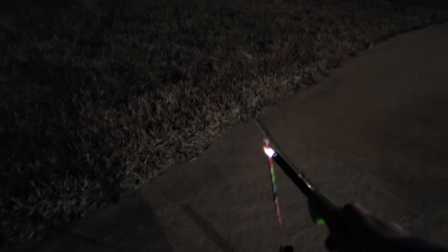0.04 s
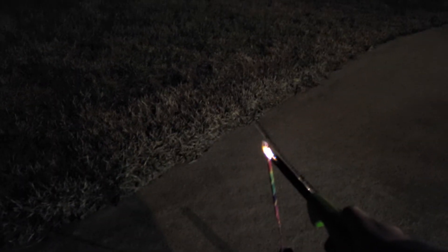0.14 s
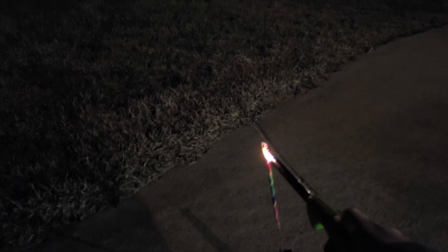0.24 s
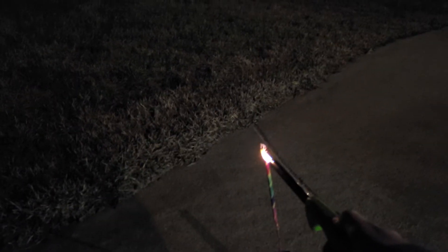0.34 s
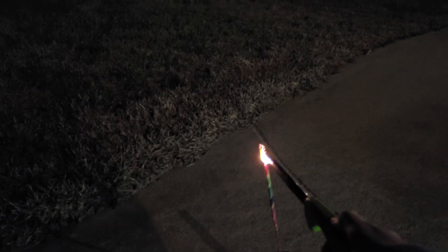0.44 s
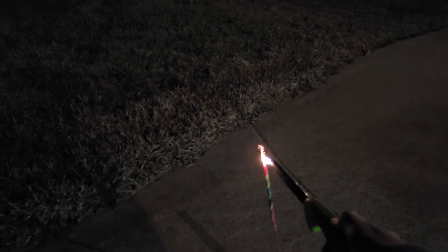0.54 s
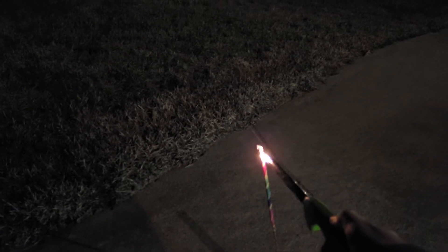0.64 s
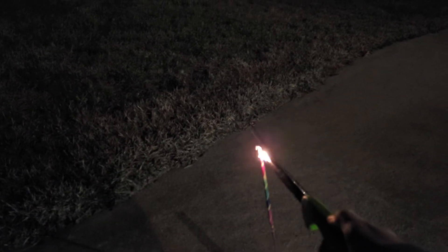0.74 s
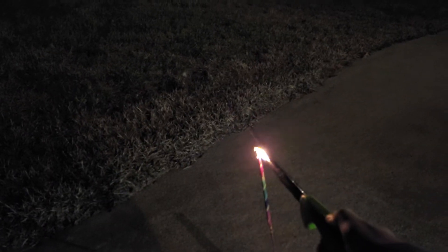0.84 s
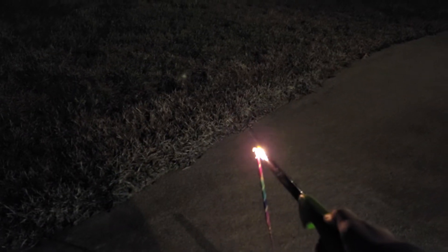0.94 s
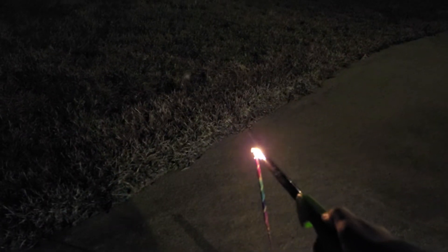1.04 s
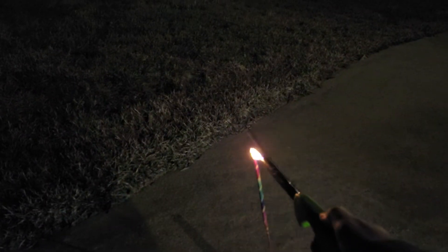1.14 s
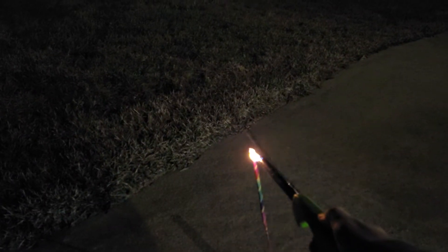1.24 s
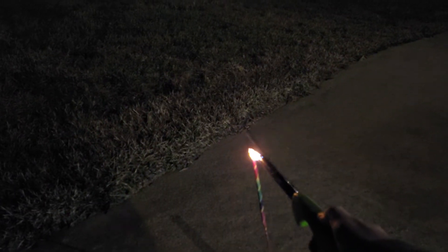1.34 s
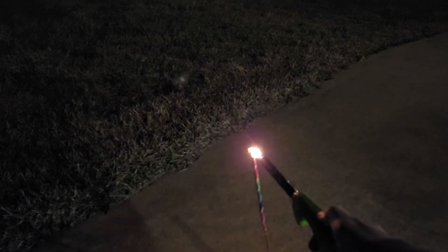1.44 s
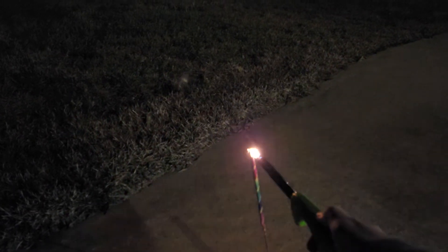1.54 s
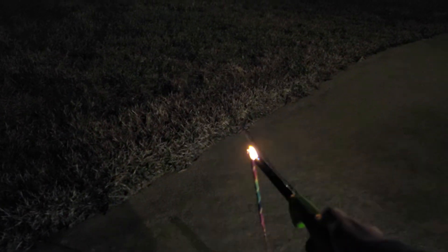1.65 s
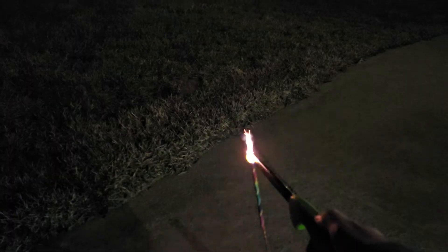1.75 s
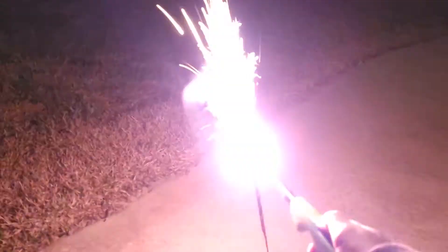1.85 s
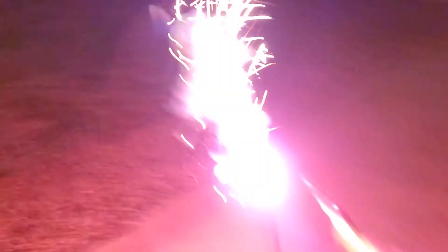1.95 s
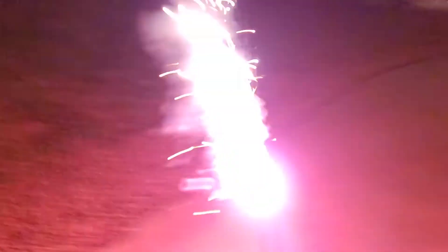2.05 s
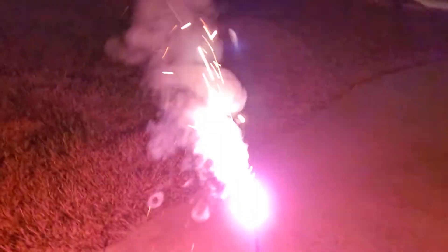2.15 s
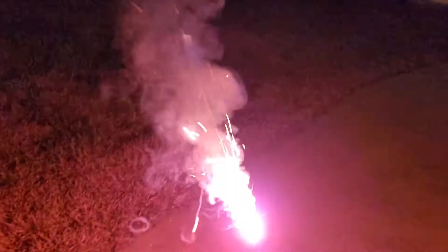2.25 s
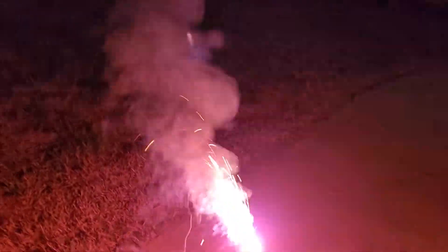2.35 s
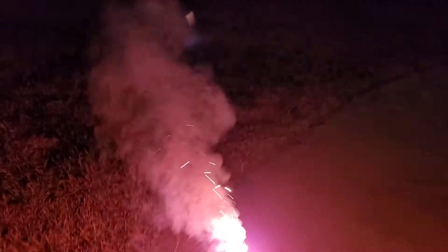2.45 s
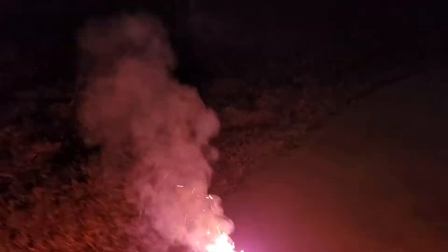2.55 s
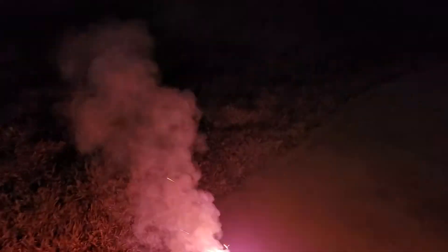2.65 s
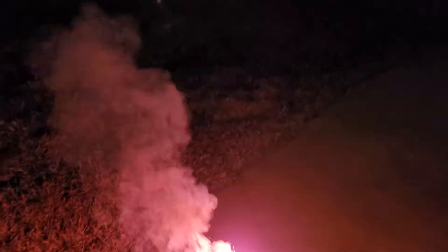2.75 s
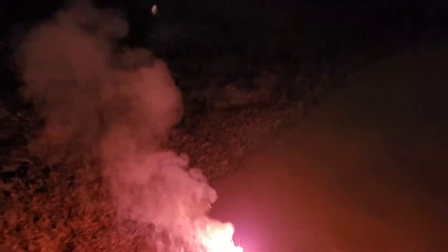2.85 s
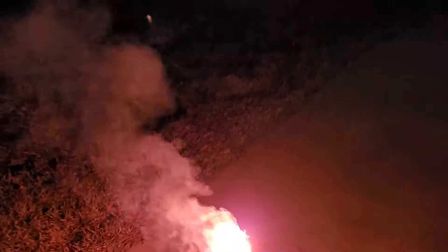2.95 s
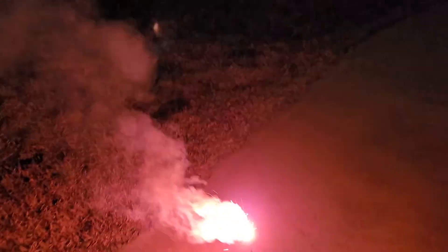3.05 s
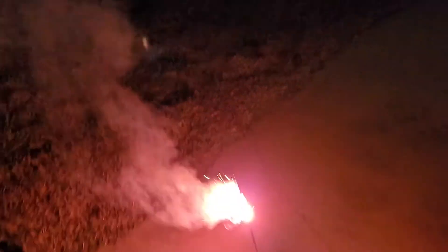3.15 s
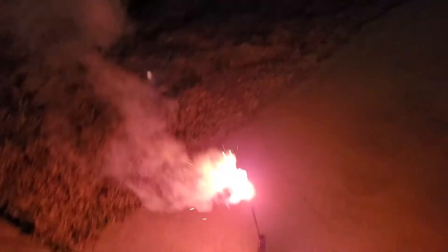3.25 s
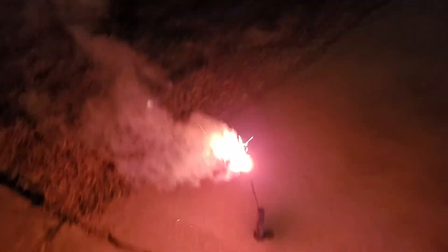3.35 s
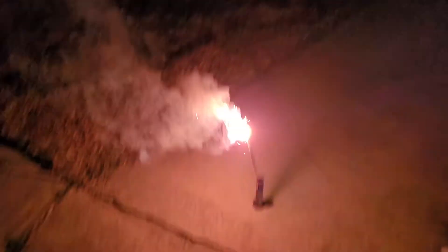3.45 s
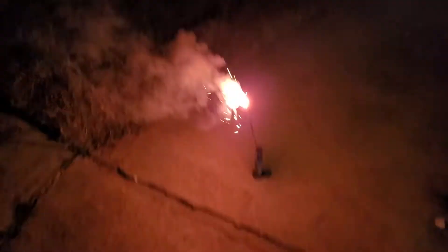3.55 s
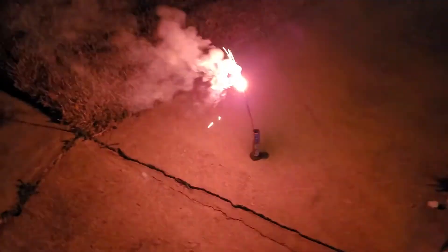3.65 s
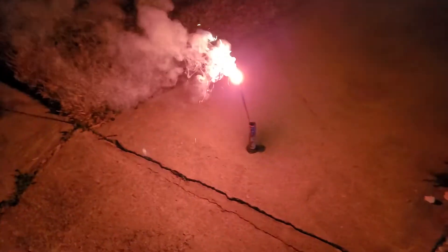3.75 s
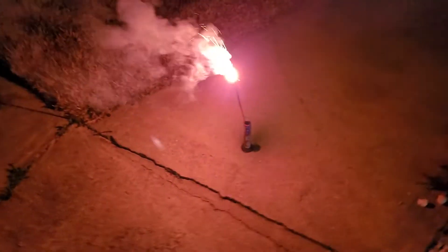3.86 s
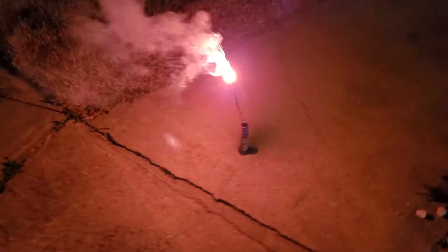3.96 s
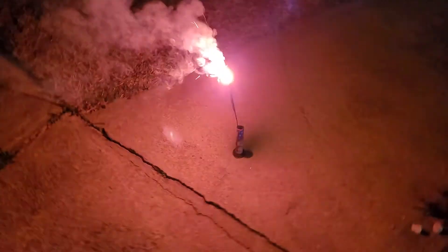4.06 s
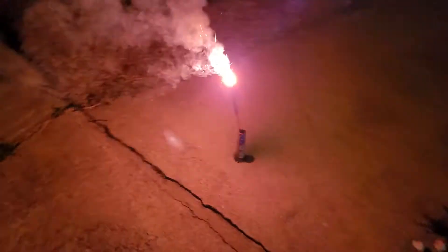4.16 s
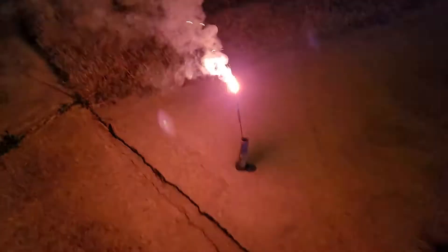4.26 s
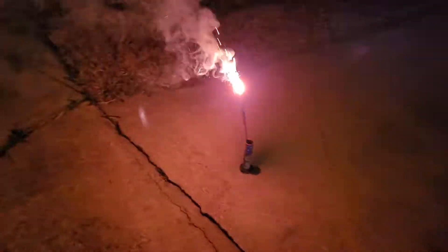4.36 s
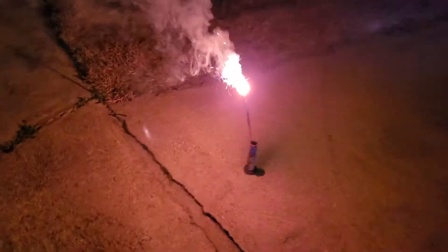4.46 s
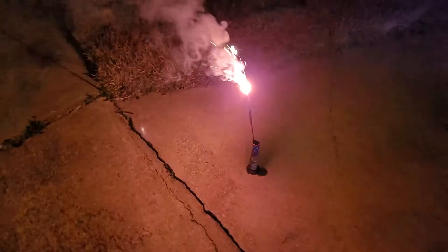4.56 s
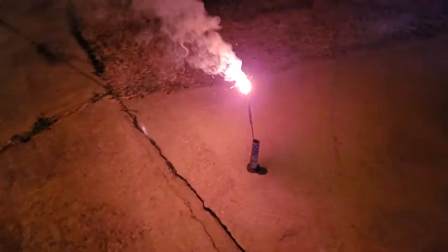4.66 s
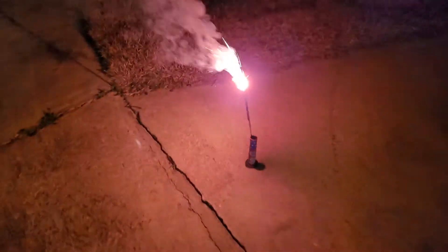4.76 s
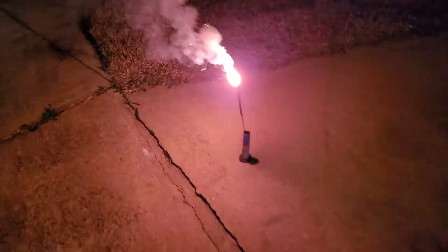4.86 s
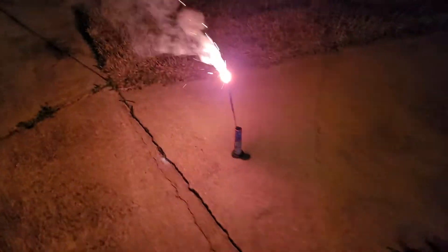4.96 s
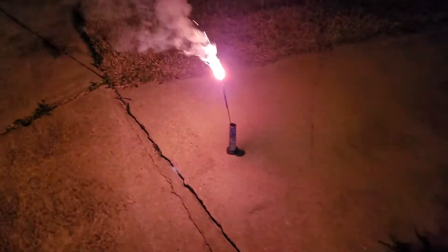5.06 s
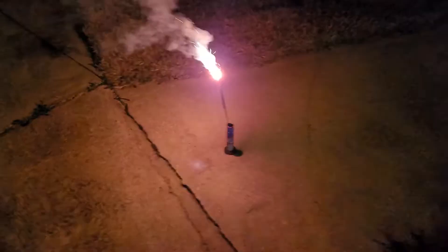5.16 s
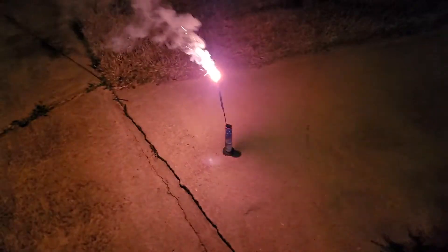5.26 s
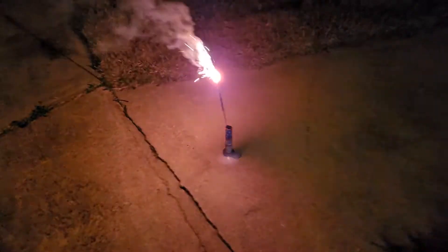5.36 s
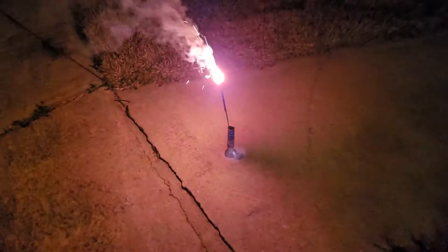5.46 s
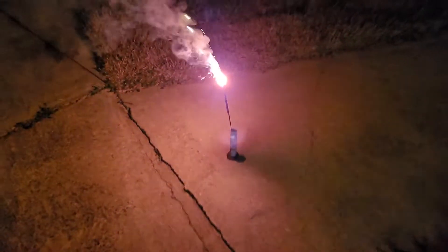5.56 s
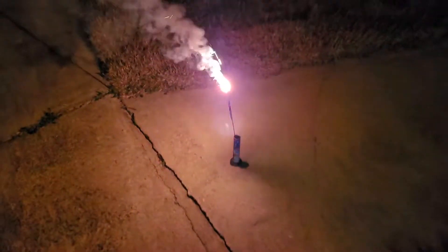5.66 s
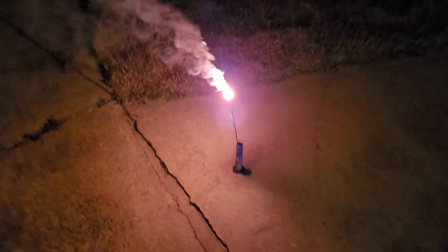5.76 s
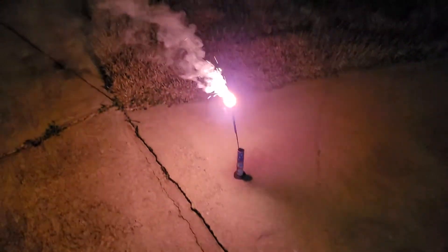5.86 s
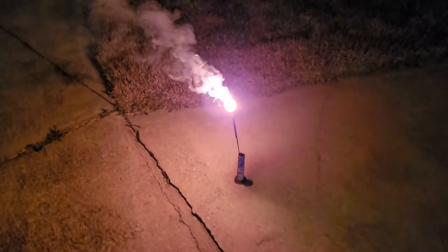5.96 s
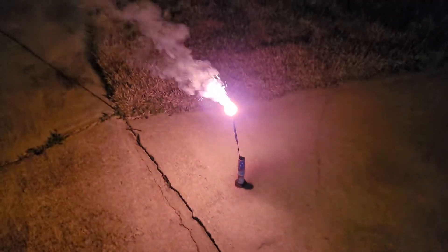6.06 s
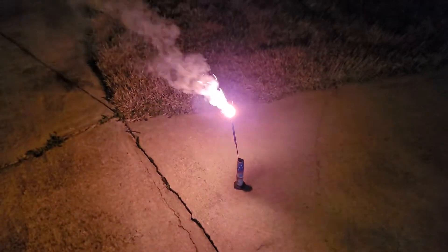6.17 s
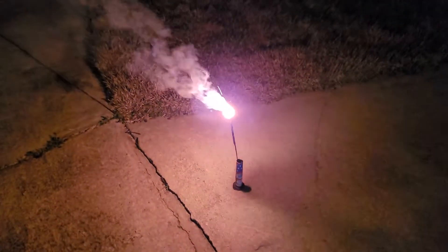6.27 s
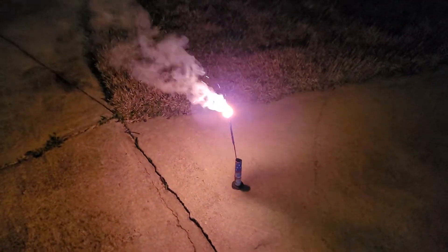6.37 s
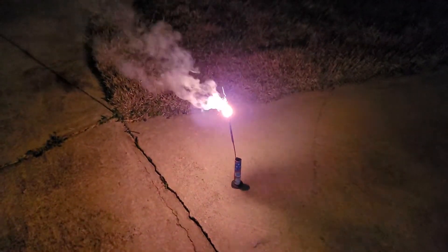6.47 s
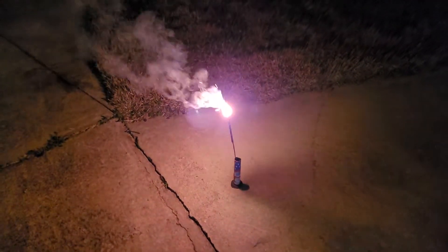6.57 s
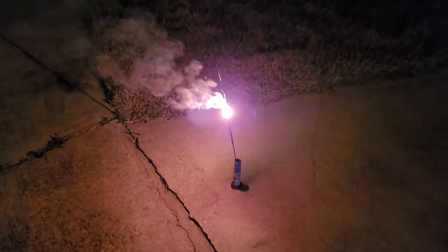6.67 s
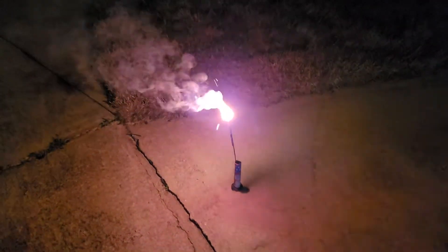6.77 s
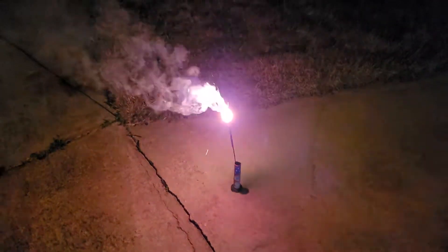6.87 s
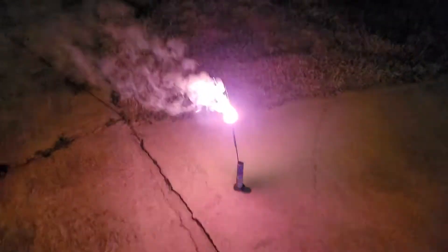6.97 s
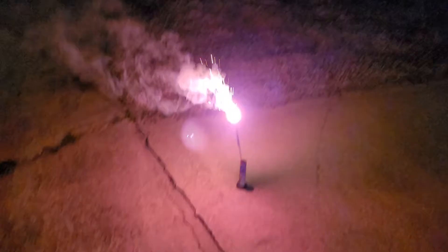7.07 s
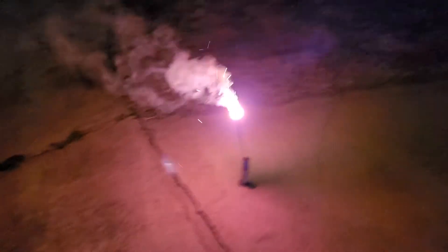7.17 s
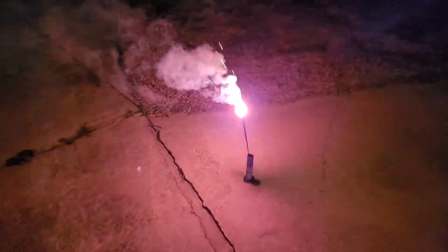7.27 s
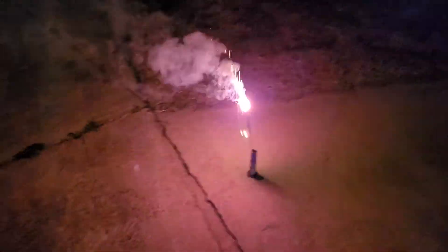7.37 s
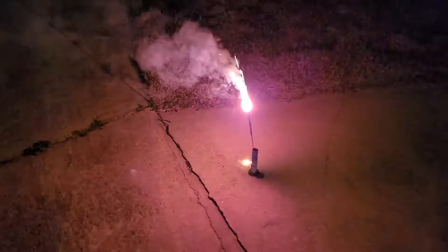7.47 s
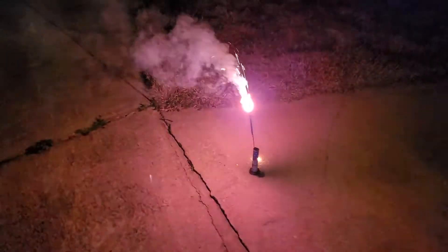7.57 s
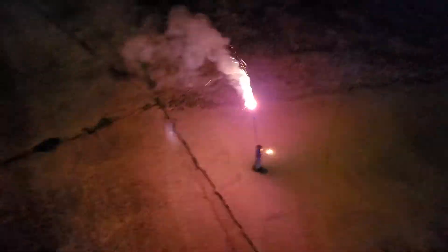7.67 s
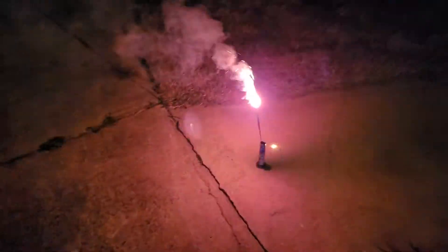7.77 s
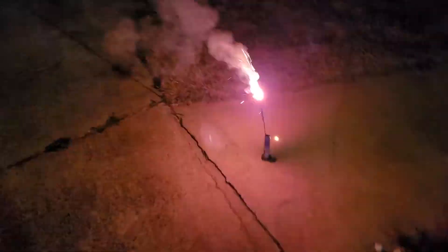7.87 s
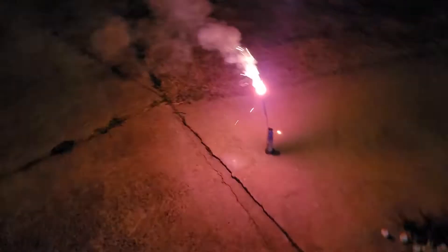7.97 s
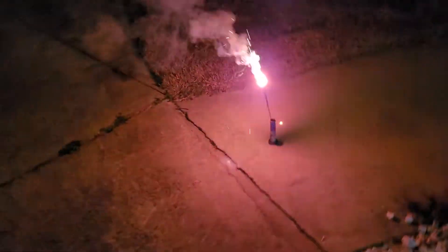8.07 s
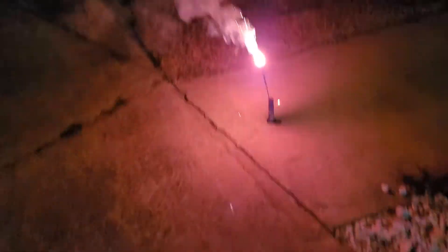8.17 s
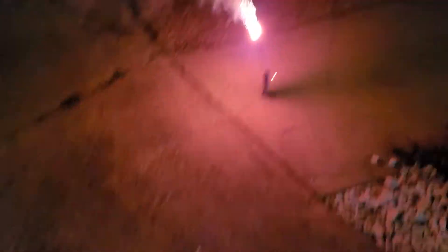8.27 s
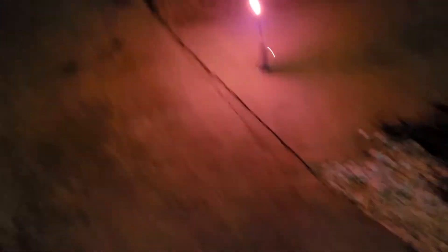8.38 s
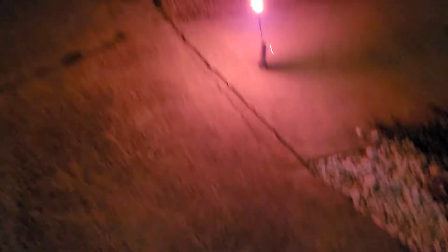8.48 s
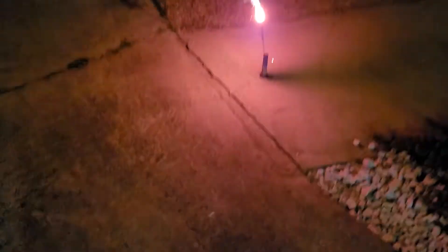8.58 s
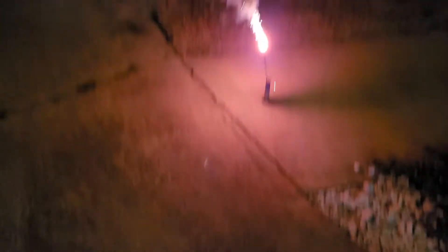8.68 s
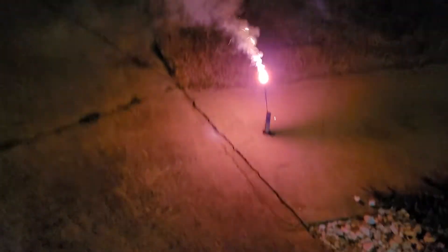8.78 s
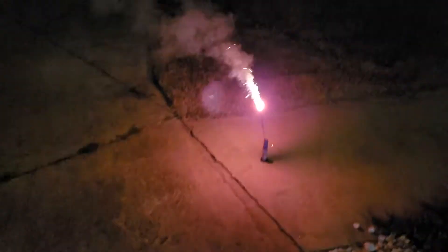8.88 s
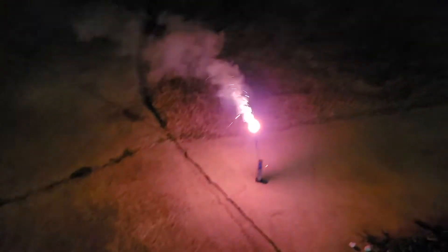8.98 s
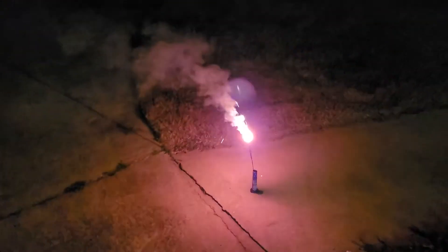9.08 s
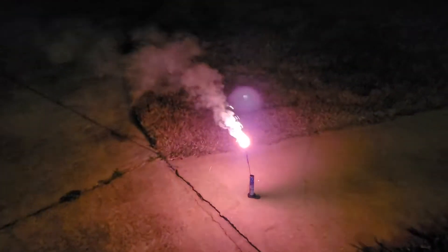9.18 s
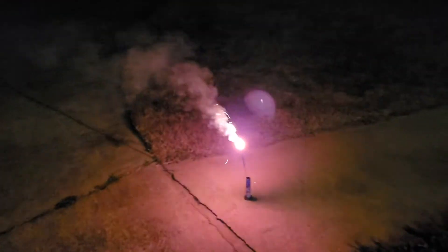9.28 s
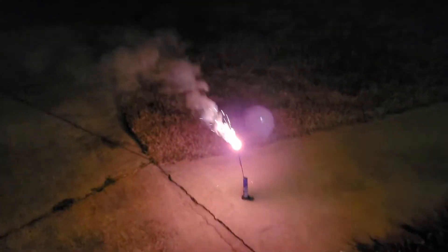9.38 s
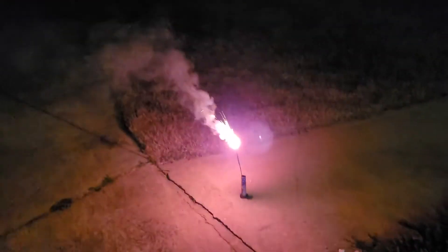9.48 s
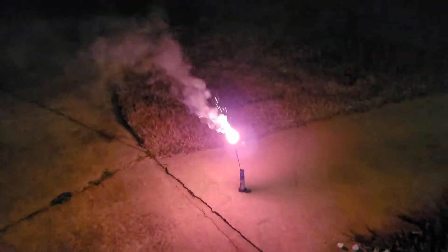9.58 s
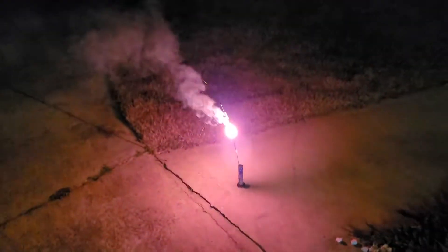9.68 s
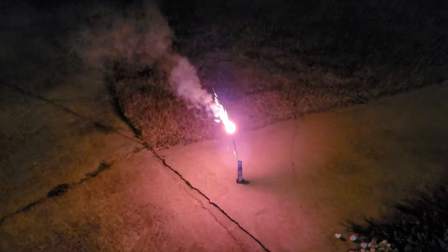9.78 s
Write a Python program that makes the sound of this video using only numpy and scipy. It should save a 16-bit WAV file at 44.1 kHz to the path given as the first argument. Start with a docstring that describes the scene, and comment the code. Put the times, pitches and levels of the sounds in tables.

```python
"""Paving outdoors at night: a sparkler standing on it catches, flares and burns on.
The jet is a dense train of random bursts over smooth gas noise, doubled by an echo off the ground that on
the whole shortens as the flame creeps down and the listener steps back. Filtered clicks make the sparks.
Noise bands make scuffing shoes, nearby snaps, far rumble, soft noise above it and wind; decaying sines make
the knocks of fingers on the handheld case, and wavering sines the far engine and other low tones."""
import sys
import numpy as np
from scipy import signal
from scipy.fft import rfft, irfft
from scipy.io import wavfile
from scipy.ndimage import map_coordinates

SR = 44100
rng = np.random.default_rng(int(sys.argv[2]) if len(sys.argv) > 2 else 0)


def wav_out(sig):
    """Save sig, one row per channel (or a flat mono array), as 16-bit PCM at SR to the path in sys.argv[1]."""
    wavfile.write(sys.argv[1], SR, np.round(np.clip(np.atleast_2d(sig).T, -1, 1) * 32767).astype(np.int16))


N = 433650
HZ = np.maximum(np.fft.rfftfreq(N, 1 / SR), 1)   # kept above zero for the logarithm
SIDES = np.array([[1], [-1]])   # left, right

# Vigour of the upper jet, which catches, flares, sags and then burns in slow surges.
# Each row: time in seconds, level in dB before puffs and chokes.
BURN_CURVE = [(1.815, -98), (1.828, -45), (1.84, -42), (1.85, -36), (1.961, -26.5), (2.05, -29),
              (2.245, -28), (2.371, -35), (2.6, -39.5), (2.97, -46.5), (3.4, -42.5), (3.65, -42.5),
              (3.87, -43), (4.15, -37), (4.3, -40), (4.7, -40), (5.03, -34.5), (5.19, -38.5), (5.27, -40.5),
              (5.6, -40.5), (6.3, -37), (6.4, -41), (6.6, -35.5), (6.8, -39.5), (7.16, -36), (7.36, -38),
              (7.74, -40.5), (8.3, -37), (8.36, -35), (8.46, -39.5), (8.71, -36), (8.92, -42), (9, -37),
              (9.3, -41.5), (9.63, -38.5), (9.83, -42)]
# Lower roar of the jet, which thins as the listener steps back.
# Each row: time in seconds, level in dB before puffs and chokes.
ROAR_CURVE = [(1.815, -100), (1.826, -62), (1.84, -53), (1.85, -40.5), (1.96, -32.5), (2.07, -38.5),
              (2.25, -42), (2.45, -46), (2.7, -45), (2.97, -50), (3.5, -48), (4.7, -48), (5.2, -49.5),
              (7.4, -52), (8.4, -52.5), (8.8, -54.5), (9.1, -55), (9.83, -57)]
# Brief dips of the jet as it chokes, and a few slight lifts.
# Each row: centre in seconds, half width in seconds, change in dB.
JET_CHOKES = [(3.25, .02, -1), (3.571, 0.0084, -8), (3.62, .02, -6), (4.19, .015, 1), (4.41, 0.026, -2),
              (4.55, .015, -0.5), (4.62, 0.0098, -4.5), (7.56, .03, 0.5), (9.31, .02, -3.5)]
# Spectrum of the jet. Each row: frequency in Hz, relative density in dB per Hz.
JET_SPECTRUM = [(230, -21.5), (450, -12.5), (750, -8), (1200, -12.5), (2000, -13), (3000, -10.5),
                (4500, -8), (6300, -6), (7400, -0.5), (8600, -7), (10000, -1.5), (12000, 3.5),
                (14000, -2.5), (15800, -5)]
# Stereo tilt of the jet before the hand turns. Each row: frequency in Hz, left over right in dB.
JET_TILT = [(300, 1.5), (1300, 3.5), (2700, 6.5), (4000, 2.5), (5300, 4.5), (7200, 0), (8600, 9),
            (11000, 1.5), (14000, 15), (15500, 14)]
# Correlation of the jet between the ports. Each row: frequency in Hz, likeness from -1 to 1.
JET_CORRELATION = [(300, 1), (900, 0.21), (1800, 0.86), (4000, 0.63), (7000, 0.43), (10000, 0.21),
                   (13000, 0.099), (15500, 0.4)]
# Reflection off the paving. Each row: time in seconds, extra path in ms, strength below about 6 kHz
# from 0 to 1, strength above it from 0 to 1.
GROUND_REFLECTION = [(1.9, 1.46, .2, .1), (3.2, 1.52, .32, .1), (3.65, 1.41, .32, .12),
                     (4.55, 1.37, .32, .12), (5.3, 1.285, .34, .18), (6.3, 1.28, .38, .23),
                     (7, 1.257, .38, .27), (7.85, 1.195, .35, .27), (8.3, 1.12, .38, .3),
                     (8.65, 1.042, .38, .35), (9.8, 1.043, .4, .38)]
# Listed sparks, loud and faint. Each row: start in seconds, nominal peak of the crack in dB, its lower part
# in dB relative to the crack.
LISTED_SPARKS = [(1.8813, -8.5, -9), (1.9227, -10, -8), (1.9796, -13, 0.5), (2.008, -29, -16),
                 (2.0569, -5, -24), (2.2506, -8, -22), (2.3163, -6.5, -14), (2.4226, -8.5, -12),
                 (2.4939, -12, -15), (2.6002, -11, -21), (2.6455, -9, -15), (2.7099, -16, -10),
                 (2.7598, -9, -14), (2.8406, -24, -4), (3.0382, -14, -12), (3.2224, -21, -5),
                 (3.2758, -8.5, -13), (3.4283, -7, -18), (3.4597, -5.5, -18.5), (3.541, -15, -9),
                 (3.5465, -19, -10), (3.555, -17, -10), (3.5984, -18, -16), (3.601, -20, -14),
                 (3.7795, -25, -19), (3.8329, -33, -20), (3.89, -13, -14), (4.0439, -15, -23),
                 (4.0574, -14, -16), (4.1117, -10, -19), (4.1502, -10, -14), (4.211, -6, -18),
                 (4.2509, -21, -4), (4.3582, -9, -29), (4.449, -19, -16), (4.564, -8, -18),
                 (4.6231, -15, -17), (4.8595, -19, -7), (4.9364, -14, -7), (5.0315, -14, -20),
                 (5.1943, -24, -18), (5.2676, -15, -24), (5.5046, -25, -11), (5.7143, -14.5, -18),
                 (5.9002, -18, -18), (6.0952, -11.5, -13), (6.5507, -11, -21), (6.6479, -11.5, -16),
                 (6.7854, -18, -16), (6.857, -23, -24), (7.1432, -10, -31), (7.1648, -10.5, -26),
                 (7.2366, -15, -17), (7.623, -15.5, -11), (7.7734, -16, -22), (8.353, -12.5, -15),
                 (8.3725, -14, -30), (8.7628, -21, -9), (8.825, -26, -26), (9.0296, -17, -20),
                 (9.204, -17, -28), (9.6147, -17, -15), (9.7618, -14, -19)]
# The hand turns. Each row: time in seconds, left over right in dB (only its departure from the mean acts),
# delay of the left port in microseconds, level change around 8-11 kHz in dB.
HAND_TURNS = [(1.8, 10, -3, 2.5), (2.3, 8.5, -5, -2), (2.7, 5.5, 44, -1), (3.2, 7.5, 60, -1),
              (3.8, 6.5, -5, 0), (4.7, 7, 26, -2.4), (5.05, 7.5, 2, -1), (5.6, 9, 10, 0),
              (6.4, 6.5, -56, 0.5), (7.1, 8, 5, -1), (7.4, 9, 29, -4.5), (7.95, 8.5, -1, -0.5),
              (8.5, 9, 10, -1.5), (9.8, 9.5, -15, -1)]
# Dry snaps close by. Each row: start in seconds, nominal peak in dB, low edge in Hz, high edge in Hz,
# 60 dB decay time of the tail in seconds.
NEAR_SNAPS = [(2.008, -14, 500, 3000, 0.039), (2.2491, -23, 905, 3000, 0.041),
              (2.6699, -12, 1610, 8200, .025), (2.6955, -21, 1200, 3500, .03),
              (2.711, -23, 1700, 8520, .03), (2.715, -35, 1600, 3000, 0.028), (2.746, -38, 1400, 2300, .03),
              (7.4596, -18, 900, 8000, 0.041), (7.4756, -19, 901, 6960, 0.043),
              (8.978, -16, 904, 4500, 0.024), (8.9833, -25, 1000, 4010, 0.04)]
# Shoes scuffing on grit. Each row: start in seconds, length in seconds, level in dB before the press and
# lift, low edge in Hz, high edge in Hz, weight of the noise unlike at the two ports.
SHOE_SCUFFS = [(2.638, .16, -45, 1530, 2700, 0.27), (7.012, 0.12, -47.5, 700, 2040, 1.3),
               (8.932, 0.085, -47, 890, 2030, 0.35)]
# Fingers on the case. Each row: start in seconds, nominal left level in dB, ringing frequency in Hz,
# tick relative to the ring in dB, signed share of ring and tick that reaches the right port.
CASE_KNOCKS = [(1.9793, -12.5, 234, -4.5, -0.11), (2.110, -19, 219, -23, -0.13),
               (2.209, -19.5, 224, -29, -0.15), (7.267, -32, 247, -27, 0.0),
               (7.359, -31, 149.7, -25, 0.032), (8.6195, -9.5, 267.4, -15, 0.065),
               (8.7184, -14, 256.4, -29, 0.011), (9.5232, -28, 376, -2.5, 0.34)]
# Far engine. Each row: time in seconds, mean firing frequency in Hz, mean level in dB, mean level of
# its octave in dB.
ENGINE_CURVE = [(3.4, 85.5, -66, -69), (3.48, 84.7, -50, -55), (3.64, 84.7, -57, -62),
                (3.74, 83.4, -48.5, -55.5), (3.91, 82.9, -68, -60), (4, 83.2, -48.5, -60),
                (4.13, 84.7, -54, -59.5), (4.31, 84.1, -47.5, -50), (4.41, 83.5, -56, -48),
                (4.57, 82, -45.5, -55.5), (4.72, 82.3, -56.5, -53), (4.8, 81.6, -47.5, -62),
                (5.2, 79.1, -55.5, -60.5), (5.35, 78.2, -50, -71), (5.67, 77.9, -48.5, -52.5),
                (5.97, 74.5, -53.5, -63), (6.16, 80.7, -63, -77), (6.36, 80, -70, -57),
                (6.52, 79.7, -45.5, -60.5), (6.72, 78.6, -58, -64), (6.8, 83.3, -69, -57),
                (6.9, 86.5, -60, -64), (7.2, 85.3, -56.5, -59), (7.5, 85, -63, -61.5),
                (7.68, 83.5, -49, -55), (7.8, 83.2, -62, -56.5), (8.05, 79.7, -55, -59),
                (8.19, 79, -67, -60), (8.3, 80.7, -43.5, -63), (8.4, 80.4, -51, -61),
                (8.51, 80.3, -61, -64), (8.87, 77.5, -65, -62), (9.04, 77.8, -52.5, -63),
                (9.13, 78.5, -68, -67), (9.26, 78.5, -53, -64), (9.42, 78.5, -70, -66),
                (9.58, 80, -55.5, -59), (9.75, 80.5, -67, -69), (9.83, 81, -56, -64)]
# Low tones: far hums, and two near 83 Hz that go with wind and knocks. Each row: start in seconds, length
# in seconds, first mean frequency in Hz, last mean frequency in Hz, crest level in dB before the throb.
LOW_TONES = [(.66, 0.26, 89.5, 94, -58), (2.05, .2, 82.7, 83, -67), (2.05, 1.78, 183.3, 198, -58),
             (2.6, 0.4, 82.6, 83, -59.5), (8.95, 0.74, 179, 179.8, -58.5)]
# Far rumble, and soft noise mostly above 420 Hz. # Each row: time in seconds, rumble in dB before its swell,
# soft noise in dB.
NIGHT_LEVELS = [(0, -64, -63.5), (.6, -58.5, -64), (1.25, -57.5, -63.5), (1.7, -57.5, -62), (2, -50, -60),
                (2.6, -52, -61), (3.1, -61.5, -54.5), (3.6, -53.5, -56), (4.5, -58, -62.5), (6.1, -58, -62),
                (6.3, -60.5, -63.5), (7.2, -57, -59.5), (8.3, -58, -59.5), (9, -59, -57.5),
                (9.83, -64, -59)]
# Spectrum of rumble and soft noise. Each row: frequency in Hz, relative density in dB per Hz.
NIGHT_SPECTRUM = [(35, -49), (60, -26), (79, -5), (139, -4.5), (262, -5), (346, -13), (448, -24.5),
                  (924, -17), (1110, -25.5), (1340, -27), (1700, -37), (2970, -42), (4640, -78),
                  (6900, -51), (16000, -78)]
# Stereo tilt of rumble and soft noise. Each row: frequency in Hz, left over right in dB.
NIGHT_TILT = [(60, 4), (110, 2), (200, 1), (380, 0), (700, -1), (1290, 5.5), (2380, 13.5), (4400, 39.5),
              (8120, 8), (15000, -12)]
# Correlation of rumble and soft noise between the ports. Each row: frequency in Hz, likeness from -1 to 1.
NIGHT_CORRELATION = [(60, 1), (130, 1), (290, 0.9), (640, 0.018), (1410, -0.27), (3100, 0.09),
                     (6820, -0.16), (15000, 0.2)]
# Gusts. Each row: crest in seconds, half width in seconds, level in dB, left over right in dB.
WIND_GUSTS = [(.95, 0.22, -65, -1), (2.46, .07, -52.5, 24), (2.9, 0.27, -63.5, 1), (3.74, 0.073, -54, 0),
              (4.9, 1.3, -59, -2), (4.68, 0.068, -60, 0), (5.6, 0.097, -62, 0), (6.6, 0.19, -64, -5),
              (7.7, .1, -58, 3), (8.35, .15, -59, -5), (8.7, .08, -55, 10), (9.4, 0.52, -63, -1)]

SPLIT_HZ = 5810   # soft crossover between the lower and upper jet
BURSTS_PER_S = 5000
PUFF_DB, PUFF_S = -5.5, 0.015   # swell of the jet after a full-scale spark, and its decay time
RANDOM_SPARKS_PER_S, RANDOM_SPARK_DB, RANDOM_LOW_DB = 7.7, -25, -16
RANDOM_SPREAD_DB = 4   # either way
BREEZE_DB, BREEZE_LUMPS_DB = -71, 2.5   # steady wind on the ports, and its slow variation
SELF_NOISE_DB = -85


def from_db(db):
    """Level to amplitude: twenty decibels make a factor of ten."""
    return 10 ** (np.asarray(db) / 20)


def rms_one(x):
    """Normalization: the mean square over all channels becomes one."""
    return x / np.sqrt(np.mean(x ** 2) + 1e-20)


def in_time(rows):
    """Linear interpolation in time: each column of a table, one value a sample."""
    s, *columns = np.transpose(rows)
    return [np.interp(np.arange(N) / SR, s, c) for c in columns]


def at_hz(points):
    """Interpolation over logarithmic frequency, onto the spectral grid."""
    hz, value = np.transpose(points)
    return np.interp(np.log(HZ), np.log(hz), value)


def drift(rate_hz):
    """Low-passed chance: two equal poles near rate_hz leave a slow random curve of spread one."""
    step = 40   # samples between drawn values
    pole = np.exp(-2 * np.pi * rate_hz * step / SR)
    draws = rng.standard_normal(N // step + 2002)
    slow = signal.lfilter([1], [1, -2 * pole, pole * pole], draws)[2000:]   # settled part only
    return np.interp(np.arange(N) / step, np.arange(len(slow)), rms_one(slow))


def band(x, low_hz, high_hz):
    """Band-pass filtering: only the range between the two edges is kept strong."""
    return signal.sosfilt(signal.butter(2, [low_hz, high_hz], "band", fs=SR, output="sos"), x)


def to_ears(pair, spectrum, balance, likeness):
    """Interaural correlation: shared and opposed signals mix by likeness into left and right spectra."""
    mid, side = rfft(pair)
    alike = np.clip(at_hz(likeness), -1, 1)
    gain = from_db(at_hz(spectrum) + at_hz(balance) * SIDES / 2)
    return gain * (np.sqrt(1 + alike) * mid + np.sqrt(1 - alike) * side * SIDES)


def ground(x, dull_hz=6000):
    """Comb filtering by a moving echo; treble lost on rough paving returns at grazing angles."""
    extra_ms, strength, treble = in_time(GROUND_REFLECTION)
    read_at = np.arange(N) - extra_ms * SR / 1000
    dull = signal.sosfiltfilt(signal.butter(2, dull_hz, fs=SR, output="sos"), x)
    # the treble leads the rest by a sample
    bounce = strength * np.roll(dull, 1, axis=1) + treble * (x - dull)
    return x + np.array([map_coordinates(c, [read_at], order=5) for c in bounce])


def low_and_high(pair):
    """Spectral colouring: a source takes the jet's spectrum and echo, split at a soft crossover."""
    ears = to_ears(ground(pair), JET_SPECTRUM, JET_TILT, JET_CORRELATION)
    upper = 1 / (1 + (SPLIT_HZ / HZ) ** 4)
    return irfft(ears * (1 - upper), N), irfft(ears * upper, N)


def jet(spark_s, spark_db, spread_db=4.0, gas_low=1.23, gas_high=0.92, flicker_db=1.19):
    """Shot noise: metal grains burst at random, few of them large, over smooth gas strongest in the roar."""
    grain_db = spread_db * np.minimum(rng.exponential(1, N), 5.0)
    sizes = from_db(grain_db) * (rng.random(N) < BURSTS_PER_S / SR)
    # shared bursts favour one polarity
    signs = np.where(rng.random((2, N)) < [[.7], [.5]], -1, 1)
    bursts = rms_one(sizes * signs)

    # each spark swells the jet, which then settles exponentially
    puffs = np.zeros(N)
    puffs[(spark_s * SR).astype(int)] = from_db(spark_db + PUFF_DB)
    swell = 1 + signal.lfilter([1], [1, -np.exp(-1 / (PUFF_S * SR))], puffs + 1e-18)
    for s, width, depth_db in JET_CHOKES:
        swell = swell * from_db(depth_db * np.exp(-((np.arange(N) / SR - s) / width) ** 2))

    gas = rng.standard_normal((2, N))
    flicker = from_db(flicker_db * (0.8 * drift(10) + 0.85 * drift(72)))
    low = low_and_high((bursts + gas_low * gas) * flicker)[0]
    high = low_and_high((bursts + gas_high * gas) * flicker)[1]
    upper_jet = from_db(in_time(BURN_CURVE)[0]) * rms_one(high)
    lower_roar = from_db(in_time(ROAR_CURVE)[0]) * rms_one(low)
    lit = np.arange(N) > BURN_CURVE[0][0] * SR
    return lit * swell * (upper_jet + lower_roar)


def spark_rows():
    """Poisson process: sparks at random intervals join the listed ones; times, peaks, lower parts."""
    draws = rng.random((300, 2))
    s = BURN_CURVE[0][0] + np.cumsum(-np.log(draws[:, 0]) / RANDOM_SPARKS_PER_S)
    peak_db = RANDOM_SPARK_DB + RANDOM_SPREAD_DB * (2 * draws[:, 1] - 1)
    random_rows = np.c_[s, peak_db, np.full(len(s), RANDOM_LOW_DB)]
    return np.transpose(np.r_[LISTED_SPARKS, random_rows[s < N / SR - .01]])


def sparks(s, peak_db, low_db, rise_s=0.0011, splinter=0.11, crisp=0.45):
    """Impulse excitation: each spark is a crack coloured like the jet, with a few splinters just after."""
    at = ((s + rise_s) * SR).astype(int)
    after = rng.integers(3, 90, (len(s), 3))   # samples from crack to splinter
    sizes = splinter * rng.standard_normal((len(s), 2, 3))
    parts = []
    for part, level_db in enumerate([peak_db + low_db, peak_db]):   # lower, upper
        clicks, unit = np.zeros((2, N)), np.zeros((2, N))
        clicks[0, at] = -from_db(level_db)
        clicks[:, at[:, None] + after] = from_db(level_db)[:, None] * sizes.transpose(1, 0, 2)
        unit[0, N // 2] = 1   # a lone click sets the reference peak
        # the upper part is brighter than the jet
        clicks, unit = (signal.lfilter([1, -crisp * part], [1], c) for c in (clicks, unit))
        reference = np.abs(low_and_high(unit)[part].mean(axis=0)).max()
        parts.append(low_and_high(clicks)[part] / reference)
    return sum(parts)


def at_ports(ears):
    """Level and time differences: the flame moves across the two ports; the case shades one band."""
    pan_db, late_us, shadow_db = in_time(HAND_TURNS)
    shaded = irfft(rfft(ears) * np.exp(-((HZ - 9600) / 1500) ** 4), N)
    ears = ears + (from_db(shadow_db) - 1) * shaded
    left = map_coordinates(ears[0], [np.arange(N) - late_us * SR / 1e6], order=5)
    return np.array([left, ears[1]]) * from_db((pan_db - pan_db.mean()) * SIDES / 2)


def snaps(rise_s=0.000858, tail_db=-24):
    """Impulse and decay: one sharp break, then a dying tail of noise, both in the band of the event."""
    out, t = np.zeros((2, N)), np.arange(SR // 5) / SR
    noises = rng.standard_normal((len(NEAR_SNAPS), 2, len(t)))
    for (s, peak_db, low_hz, high_hz, t60), noise in zip(NEAR_SNAPS, noises):
        tail = from_db(tail_db - 60 * t / t60) * noise
        burst = band(tail - (t == 0), low_hz, high_hz)
        at = int((s + rise_s) * SR)
        out[:, at:at + len(t)] += from_db(peak_db + 1.5 * SIDES) * burst / np.abs(burst).max()
    return out


def scuffs(grains_per_s=1200, spread_db=2.0):
    """Granular friction: grit crunches at random under a sole that presses and lifts."""
    out = np.zeros((2, N))
    grain_db = spread_db * np.minimum(rng.exponential(1, N), 4.0)
    grit = from_db(grain_db) * (rng.random(N) < grains_per_s / SR)
    shared, own = grit * rng.choice([-1, 1], N), grit * rng.choice([-1, 1], (2, N))
    for s, length, level_db, low_hz, high_hz, unlike in SHOE_SCUFFS:
        span = slice(int(s * SR), int((s + length) * SR))
        crunch = rms_one(band(shared[span] + unlike * own[:, span], low_hz, high_hz))
        along = np.linspace(0, 1, crunch.shape[1])
        weight = np.sin(np.pi * along ** 0.72)   # quick press, slower lift
        out[:, span] += from_db(level_db + 0.63 * SIDES) * crunch * weight
    return out


def knocks(rustle_t60_s=.15, rustle_db=-26):
    """Damped resonance: the case rings low for a few cycles, with a dull tick and a rustle of the grip."""
    out, t = np.zeros((2, N)), np.arange(SR // 4) / SR
    noises = rng.standard_normal((len(CASE_KNOCKS), 2, len(t)))
    for (s, level_db, hz, tick_db, right), noise in zip(CASE_KNOCKS, noises):
        push = np.sin(2 * np.pi * hz * t) * from_db(-60 * t / .022) * (1 - np.exp(-t / .0015))
        tick_tones = np.sin(2 * np.pi * 1100 * t) + 1.8 * np.sin(2 * np.pi * 560 * t)
        tick = from_db(tick_db) * tick_tones * np.exp(-t / 0.0019)
        rustle = from_db(rustle_db - 60 * t / rustle_t60_s) * rms_one(band(noise, 150, 2800))
        knock = band(push + tick, 38, 3000) * [[1], [right]] + rustle
        at = int(s * SR)
        out[:, at:at + len(t)] += from_db(level_db) * knock
    return out


def drone(hz, level_db, waver_hz, throb_db, pan_db):
    """Frequency and amplitude modulation: one low tone wavers and throbs at random."""
    phase = 2 * np.pi * np.cumsum(hz + waver_hz * drift(7.8)) / SR
    loudness = np.sqrt(2) * from_db(level_db + throb_db * drift(6.3) + pan_db * SIDES)
    return loudness * np.sin(phase + 0.11 * SIDES)


def engine():
    """Harmonic source: a far engine's firing tone and its octave, wavering over the distance."""
    hz, level_db, octave_db = in_time(ENGINE_CURVE)
    heard = np.arange(N) >= ENGINE_CURVE[0][0] * SR
    firing = drone(hz, level_db, 1.66, throb_db=1.5, pan_db=0.2)
    octave = drone(2 * hz, octave_db, 3.5, throb_db=3.5, pan_db=1.0)
    return heard * (firing + octave)


def low_tones():
    """Gliding sines under half-sine envelopes: far hums, and two near 83 Hz that go with wind and knocks."""
    out = np.zeros((2, N))
    for s, length, first_hz, last_hz, tone_db in LOW_TONES:
        along = np.clip((np.arange(N) / SR - s) / length, 0, 1)
        glide_hz = first_hz + (last_hz - first_hz) * along
        out += np.sin(np.pi * along) * drone(glide_hz, tone_db, 2.1, throb_db=-1.0, pan_db=0.6)
    return out


def night(swell_db=2.0):
    """Filtered noise: soft noise mostly above 420 Hz beside far rumble."""
    rumble_db, soft_db = in_time(NIGHT_LEVELS)
    noise = rng.standard_normal((2, N))
    ears = to_ears(noise, NIGHT_SPECTRUM, NIGHT_TILT, NIGHT_CORRELATION)
    low = 1 / (1 + (HZ / 420) ** 4)
    rumble, soft = rms_one(irfft(ears * low, N)), rms_one(irfft(ears * (1 - low), N))
    return from_db(rumble_db + swell_db * drift(2.25)) * rumble + from_db(soft_db) * soft


def wind():
    """Flow noise at the ports: low-frequency lumps under a breeze and bell-shaped gusts."""
    t = np.arange(N) / SR
    push = from_db(BREEZE_DB + BREEZE_LUMPS_DB * drift(0.87)) * np.ones((2, 1))
    for s, width, gust_db, pan_db in WIND_GUSTS:
        push = push + from_db(gust_db + pan_db * SIDES / 2) * np.exp(-((t - s) / width) ** 2)
    air = rng.standard_normal(N) + 0.44 * rng.standard_normal((2, N))   # shared plus own
    return push * rms_one(band(band(air, 46.5, 64.3), 30, 69))


def scene():
    """Superposition: all sources add outdoors, with no room."""
    s, peak_db, low_db = spark_rows()
    sparkler = at_ports(jet(s, peak_db) + sparks(s, peak_db, low_db))
    return sparkler + snaps() + scuffs() + knocks() + engine() + low_tones() + night() + wind()


def record(dry):
    """Noise floor and band limit: faint hiss of the electronics joins and a steep low-pass cuts the top."""
    noisy = dry + from_db(SELF_NOISE_DB) * rng.standard_normal(dry.shape)
    return signal.sosfilt(signal.ellip(14, .3, 70, 15830, fs=SR, output="sos"), noisy)


dry = scene()
out = record(dry)
wav_out(out)
```